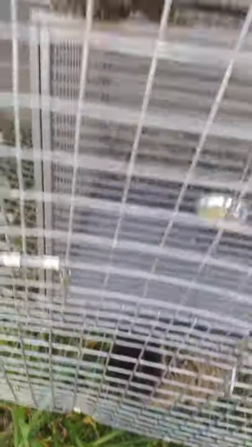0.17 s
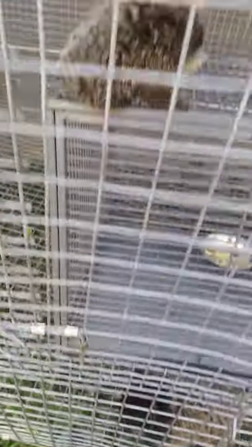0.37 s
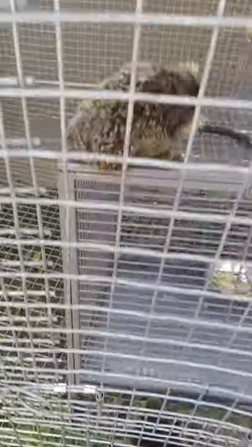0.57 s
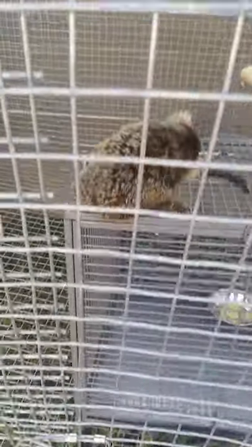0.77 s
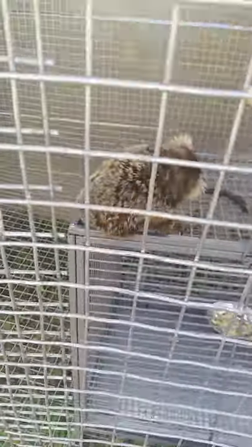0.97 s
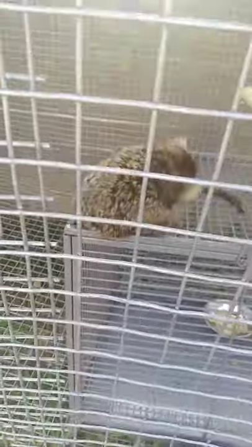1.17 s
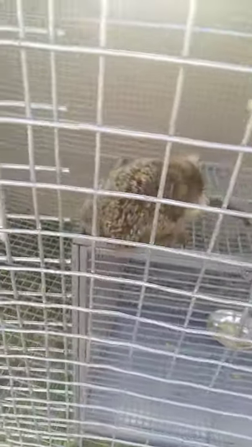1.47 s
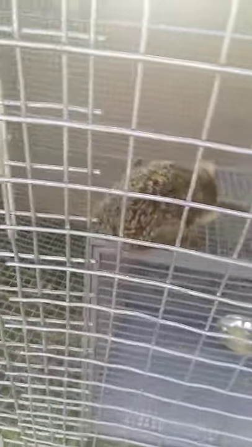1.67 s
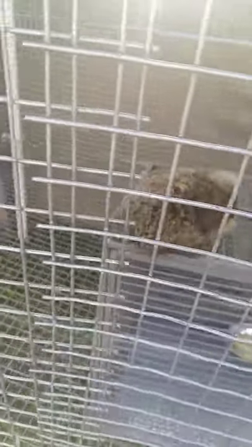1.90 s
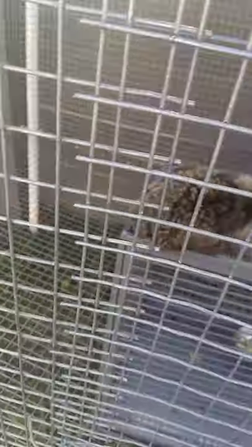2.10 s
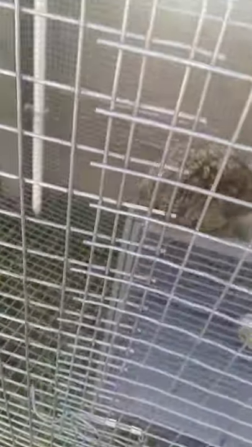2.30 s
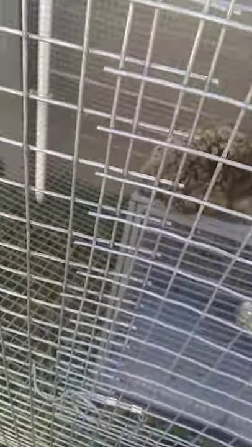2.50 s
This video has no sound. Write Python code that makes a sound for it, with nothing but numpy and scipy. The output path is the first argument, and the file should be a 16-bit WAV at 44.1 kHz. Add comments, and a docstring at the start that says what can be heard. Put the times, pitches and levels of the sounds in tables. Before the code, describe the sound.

One abrupt raspy screech from a caged animal comes late, after quiet rumbling, steady low hum and hiss, with soft hollow trickling blips, light wire taps and thin metallic squeaks, picked up by a nearby phone outdoors.

```python
"""A raspy call in a wire cage

A small animal in an outdoor wire cage gives one harsh call near a phone: rough pulses and breath ring narrow lines.
Before it, claws tick wires, which ring in their own modes, and scrape on fine mesh, a shimmer of rung lines.
Thin metallic whistles, made of tone and narrow noise, come and go; soft hollow blips, pairs of gliding tones,
sound like trickling water. Under it all lie a lumpy low rumble and microphone hiss, both shaped noise,
and a mains hum of two steady tones."""
import sys
import numpy as np
from scipy import signal
from scipy.io import wavfile
from scipy.ndimage import uniform_filter1d

SR = 44100
rng = np.random.default_rng(int(sys.argv[2]) if len(sys.argv) > 2 else 0)


def to_wav(s):
    """Save 16-bit WAV."""
    ch = np.atleast_2d(s).T  # columns
    pcm = np.round(np.clip(ch, -1, 1) * 32767)  # PCM
    wavfile.write(sys.argv[1], SR, pcm.astype(np.int16))


def how_loud(loudness_db):
    """Turn decibels into a plain amplitude multiplier (0 dB gives 1, 20 dB gives 10)."""
    steps = np.asarray(loudness_db, float) / 20
    return 10 ** steps


N = 116865  # length in samples


def evened(x):
    """Scales a sound to an rms of 1."""
    return x / np.sqrt(np.mean(x ** 2) + 1e-20)


def add(mix, start_s, sound):
    """Mixes a sound in at start_s seconds, cut off at the end of the mix."""
    start = round(start_s * SR)
    part = mix[start:start + len(sound)]
    part += sound[:len(part)]


def arch(size, rise):
    """Soft bump from 0 to 1 and back that peaks after the share rise of its length."""
    u = np.linspace(0, 1, size)
    rise = np.clip(rise, 0.05, 0.9)
    return np.sin(np.pi / 2 * np.minimum(u / rise, (1 - u) / (1 - rise)))


def noise(spectrum, patchy_db, size):
    """Noise from random short-time spectra, with patches of level that drift in pitch and time."""
    frames = 4 * N // size + 12
    hz = np.fft.rfftfreq(size, 1 / SR)
    real, imaginary, patches = rng.standard_normal((frames, len(hz), 3)).T
    patches = uniform_filter1d(patches, size=6, axis=0)
    patches = evened(uniform_filter1d(patches, size=6, axis=1))
    table_hz, table_db = np.transpose(spectrum)
    level_db = np.interp(np.log(hz + 1), np.log(table_hz), table_db)[:, None]
    spectra = (real + 1j * imaginary) * how_loud(level_db + patchy_db * patches)
    sound = signal.istft(spectra, nperseg=size, noverlap=size * 3 // 4)[1]
    return evened(sound[size:N + size])


def clicks(size, per_s, spread_db):
    """Irregular clicks of random sign; a few are large."""
    chance, sign, strength = rng.random((size, 3)).T
    happens = chance < per_s / SR
    level_db = spread_db * np.minimum(-np.log(strength + 1e-9), 4)
    return happens * np.sign(sign - 0.5) * how_loud(level_db)


def resonate(x, hz, width_hz):
    """Steep resonance of gain 1: shifts the pitch down to zero, smooths twice, shifts back."""
    turn = np.exp(2j * np.pi * np.cumsum(hz * np.ones(len(x))) / SR)
    r = np.exp(-np.pi * width_hz / SR)
    smooth = signal.lfilter([(1 - r) ** 2], [1, -2 * r, r * r], x / turn)
    return 2 * (turn * smooth).real


def cluster(lines, width_hz, size, per_s):
    """Irregular pulses and turbulence ring a cluster of narrow, wandering lines."""
    rasp_spread_db, breath = 2.5, 0.64  # breath: turbulence against pulses of rms 1
    drift = 0.0048  # rms share of the pitch by which the lines wander
    steady_s = 0.027  # effort is evened out over spans longer than this
    warm = size + SR // 10  # time for the lines to get going, cut off below
    drive = evened(clicks(warm, per_s, rasp_spread_db)) + breath * rng.standard_normal(warm)
    slow = uniform_filter1d(rng.standard_normal((len(lines), warm)), SR // 20)
    wander = 1 + drift * evened(slow)
    ring = np.zeros(warm)
    for (hz, db), bend in zip(lines, wander):
        ring += how_loud(db) * evened(resonate(drive, hz * bend, width_hz))
    power = abs(uniform_filter1d(ring ** 2, int(steady_s * SR)))
    steady = ring / np.sqrt(power + 1e-9)
    return evened(steady[-size:])


# The color of the low rumble. Each row: frequency in Hz, relative level in dB per Hz.
RUMBLE_COLOR = [(18, -25), (44, -16.5), (55, 2), (125, 1.5), (150, -1), (185, -9), (245, -13), (280, -26),
                (420, -40.5), (600, -90)]
# How loud the upper part of the rumble is, before gusts. Each row: time in seconds, level in dB rms.
UPPER_RUMBLE_LEVEL = [(0, -55.5), (.3, -55.5), (.55, -63.5), (.68, -62.5), (.75, -65), (.86, -58),
                      (1.12, -59), (1.49, -59), (1.57, -71), (1.61, -56), (1.74, -64), (1.83, -56.5),
                      (2.22, -59.5), (2.27, -67), (2.3, -52), (2.37, -64.5), (2.65, -63)]


def rumble():
    """Low noise that heaves with slow random gusts, most in its upper part."""
    split_hz, low_db, gust_db = 165, -47.5, 2.5
    low_follows = 0.24  # share of the upper part's level swings that the deep part follows
    t = np.arange(N) / SR
    gust = np.zeros(N)
    for hz in np.geomspace(2, 30, num=20):
        gust += np.sin(2 * np.pi * (hz * t + rng.random())) / np.sqrt(hz)
    level_db = np.interp(t, *np.transpose(UPPER_RUMBLE_LEVEL)) + gust_db * evened(gust)
    whole = noise(RUMBLE_COLOR, patchy_db=0.0, size=8192)
    low = signal.oaconvolve(whole, signal.firwin(SR // 10 + 1, split_hz, fs=SR), "same")
    upper = evened(whole - low) * how_loud(level_db)
    return how_loud(low_db) * evened(low * how_loud(low_follows * level_db)) + upper


# The tones of the mains hum. Each row: frequency in Hz, level in dB rms.
HUM_TONES = [(120, -52.5), (240, -70.5)]


def hum():
    """Steady sine tones of the mains."""
    t = np.arange(N) / SR
    return sum(how_loud(db) * np.sqrt(2) * np.sin(2 * np.pi * hz * t) for hz, db in HUM_TONES)


# The color of the microphone's hiss. Each row: frequency in Hz, relative level in dB per Hz.
HISS_COLOR = [(180, -24), (300, -6), (405, -7), (656, -4), (994, -4), (1150, -9.5), (1840, -15),
              (15000, -22.5), (16000, -16)]


def hiss():
    """Nearly steady noise of the microphone."""
    hiss_db = -71.5  # rms
    return how_loud(hiss_db) * noise(HISS_COLOR, patchy_db=0.33, size=1024)


def blip(hz, length_s):
    """Two close bubble tones that beat and rise a little in pitch."""
    glide = 0.11  # whole rise as a share of the pitch
    beat_hz, beat_share = 43.3, 0.4  # second bubble: this far above, this strong
    u = np.linspace(-0.5, 0.5, int(length_s * SR))
    phase = 2 * np.pi * np.cumsum(hz * (1 + glide * u)) / SR
    tones = np.sin(phase) + beat_share * np.sin(phase * (1 + beat_hz / hz))
    return arch(len(u), rise=0.33) ** 1.27 * tones


# Clear hollow blips. Each row: start in seconds, peak of the stronger tone in dB, pitch in Hz,
# length in seconds.
CLEAR_BLIPS = [(0.086, -61.5, 739, 0.06), (0.149, -60, 833, 0.013), (0.214, -65, 680, 0.026),
               (0.434, -56, 681, 0.046), (0.577, -58.5, 701, 0.029), (0.791, -51, 773, 0.016),
               (0.911, -63, 890, 0.015), (1.079, -60, 654, 0.063), (1.198, -60, 783, 0.019),
               (1.539, -60, 877, 0.012), (1.752, -59.5, 883, 0.014), (1.855, -66.5, 655, 0.039),
               (1.958, -65.5, 930, 0.021), (2.127, -54.5, 914, 0.018), (2.558, -70, 970, 0.038)]


def trickle():
    """Clear bubble blips over a random patter of small ones."""
    small_per_s, small_db = 40, -84  # all pitches together; rms
    clear, small = np.zeros(N), np.zeros(N)
    for start_s, db, hz, length_s in CLEAR_BLIPS:
        add(clear, start_s, how_loud(db) * blip(hz, length_s))
    for hz in np.geomspace(580, 1050, num=12):
        starts = clicks(N, small_per_s / 12, spread_db=0.0)
        small += signal.oaconvolve(starts, blip(hz, length_s=0.018))[:N]
    return clear + how_loud(small_db) * evened(small)


def tick(wire, db, rattle_s):
    """A sharp tap and a dying rattle ring the modes of one wire."""
    ring_s, crack_s, crack_db = 0.17, 0.026, 31  # times to fall 60 dB; crack over ring
    t = np.arange(SR // 4) / SR
    rattle = 0.066 * clicks(len(t), per_s=840, spread_db=2) * how_loud(-60 * t / rattle_s)
    rattle[0] = 1  # the tap itself
    modes = np.zeros(len(t))
    for hz, mode_db in wire:
        # the modes start loosely in step
        modes += how_loud(mode_db) * np.cos(2 * np.pi * hz * (t - 0.0015) + 2.0 * rng.random())
    fade = how_loud(-60 * t / ring_s) + how_loud(crack_db - 60 * t / crack_s)
    body = modes * fade * np.minimum(t / 0.003, 1) ** 2
    return how_loud(db) * signal.fftconvolve(rattle, body)[:len(t)] / abs(body).max()


# The ringing modes of three mesh wires. Each row: frequency in Hz, relative level in dB.
FIRST_WIRE = [(2840, -10), (3130, -4), (3400, 1), (3660, 0), (3720, -8), (3960, -3), (4760, -18),
              (5250, -10), (5560, -14), (5710, -6)]
SECOND_WIRE = [(2860, -2), (2990, 0), (3520, -2), (3680, 4.5), (3770, 0), (4200, -8), (4670, -7)]
THIRD_WIRE = [(3550, 3), (3800, 11), (4050, 9)]
# A claw ticks each wire, in that order; the second wire is hit again shortly after, a brief 4.7 kHz ring listed
# among the whistles. Each row: start in seconds, peak of the tap in dB, # time in seconds for the rattle to
# fall 60 dB.
CLAW_TICKS = [(0.4745, -46, 0.15), (1.012, -48.5, 0.2), (1.558, -60, 0.093)]


def claw_ticks():
    """Single claw taps, each of which rings one wire."""
    out = np.zeros(N)
    for (start_s, db, rattle_s), wire in zip(CLAW_TICKS, (FIRST_WIRE, SECOND_WIRE, THIRD_WIRE)):
        add(out, start_s, tick(wire, db, rattle_s))
    return out


# The lines of the fine mesh. Each row: frequency in Hz, relative level in dB.
FINE_MESH = [(6320, -1.5), (6450, -6), (6580, -6), (6960, -9), (7070, -4.5), (7240, -5), (7480, -4.5)]
# Claws drag over the mesh. Each row: start in seconds, length in seconds, level at the peak in dB rms,
# share of the length before the peak.
CLAW_SCRAPES = [(0.407, .33, -68, 0.18), (.922, 0.051, -80, 0.17)]


def claw_scrapes():
    """Dragging claws: dense irregular pulses ring the fine mesh."""
    out = np.zeros(N)
    for start_s, length_s, db, rise in CLAW_SCRAPES:
        size = int(length_s * SR)
        shimmer = cluster(FINE_MESH, 56, SR // 2, per_s=2000)[:size]
        add(out, start_s, how_loud(db) * arch(size, rise) ** 1.13 * shimmer)
    return out


def whistle(length_s, db, hz, last_hz=None):
    """A thin sound, mostly tone when low and narrow noise when high, that swells and fades."""
    all_noise_hz, width_hz = 6500, 116  # from all_noise_hz up there is no tone left
    size = int(length_s * SR)
    slide = np.linspace(hz, last_hz or hz, size)
    pitch = np.r_[np.full(SR // 2 - size, hz), slide]  # the noise warms up on the first pitch
    fuzz = evened(resonate(rng.standard_normal(SR // 2), pitch, width_hz))[-size:]
    tone = np.sqrt(2) * np.sin(2 * np.pi * (np.cumsum(slide) / SR + rng.random()))
    share = min((hz / all_noise_hz) ** 2, 1)
    blend = evened(np.sqrt(share) * fuzz + np.sqrt(1 - share) * tone)
    return how_loud(db) * arch(size, rise=0.14) * blend


# Whistles at one pitch; the row at 1.028 s is a brief second claw hit on the second wire. Each row: start in
# seconds, length in seconds, level at the peak in dB rms, # pitch in Hz.
LEVEL_WHISTLES = [(0, 0.026, -75.5, 5750), (0.341, 0.061, -76, 2680), (0.473, 0.12, -77.5, 1300),
                  (0.38, 0.28, -74, 7020), (0.923, 0.049, -80, 9000), (0.929, 0.045, -79, 8100),
                  (1.028, .014, -68, 4680), (1.475, .035, -83, 8070), (0.434, 0.12, -75.5, 8120),
                  (0.463, 0.1, -83, 10550), (1.436, 0.098, -78.5, 6530), (1.473, 0.076, -78, 7490),
                  (1.511, 0.0093, -72, 4060), (1.592, 0.15, -75.5, 7800), (1.757, 0.051, -82, 4400),
                  (1.808, 0.03, -76.5, 7200), (2.328, 0.038, -78.5, 4650), (2.504, .09, -73, 3600),
                  (2.567, .028, -76, 4650)]
# Sliding lines of the claws scraping over the mesh: one during the first scrape, the rest around 1.4 to 1.6 s.
# # Each row: start in seconds, length in seconds, level at the peak in dB rms, first pitch in Hz, last pitch in
# Hz.
SLIDING_WHISTLES = [(.49, 0.083, -79, 7870, 7800), (1.418, 0.09, -81.5, 7300, 6900),
                    (1.49, 0.11, -78, 7100, 7250), (1.565, .05, -79, 7000, 7800)]


def whistles():
    """The thin metallic whistles of the cage, each at its own time, together with a brief second hit on a wire
    and the sliding lines of the claw scrapes over the mesh."""
    out = np.zeros(N)
    for start_s, *settings in LEVEL_WHISTLES + SLIDING_WHISTLES:
        add(out, start_s, whistle(*settings))
    return out


def enclosure(x):
    """Adds the short diffuse tail of the enclosure, a fading burst of noise."""
    echo_db, echo_s = -6, 0.27  # tail against the direct sound; time to fall 60 dB
    t = np.arange(SR // 4) / SR
    tail = rng.standard_normal(len(t)) * how_loud(-60 * t / echo_s) * (t > 0.006)
    return x + how_loud(echo_db) * signal.fftconvolve(x, tail / np.linalg.norm(tail))[:N]


# The lines in each part of the call. Each row: frequency in Hz, relative level in dB.
MAIN_LINES = [(2020, -23), (2080, 1), (2155, 3.5), (2278, 1.5), (2415, 5.5), (2485, 7.5), (2565, 2),
              (2900, -2.5), (3050, -1)]
LOW_LINES = [(1160, -6.5), (1350, -2.5), (1470, 0), (1740, -7), (3740, -13)]
SECOND_LINES = [(4340, -7), (4560, 1), (4655, 3.5), (4800, -1), (5060, 6), (5160, -5), (5520, -3.5)]
TOP_LINES = [(6550, -4), (7020, -1.5), (7560, -2), (7800, 2), (8040, 5.5), (8400, 1), (8650, -4)]
# How each part swells and dies: main, low, second, top, faint tail of the top. Each row: held level
# in dB rms, rise in seconds, hold in seconds, time in seconds to fall 60 dB, line width in Hz.
CALL_SHAPES = [(-47.5, 0.011, 0.0096, 0.31, 97), (-57.5, 0.0023, 0.016, 0.18, 34),
               (-63.5, 0.016, 0.09, 0.33, 150), (-57.5, 0.0071, 0.016, 0.045, 150),
               (-71.5, 0.0072, 0.041, 0.5, 93)]


def call():
    """A rasp in four groups of lines; each part rises, holds and dies in its own time."""
    start_s, rasp_per_s = 2.348, 1600
    t = np.arange(SR * 3 // 10) / SR
    out = np.zeros(N)
    groups = (MAIN_LINES, LOW_LINES, SECOND_LINES, TOP_LINES, TOP_LINES)
    for lines, (db, rise_s, hold_s, fall_s, width_hz) in zip(groups, CALL_SHAPES):
        fade_db = -60 * np.maximum(t - rise_s - hold_s, 0) / fall_s
        shape = np.minimum(t / rise_s, 1) ** 2 * how_loud(db + fade_db)
        add(out, start_s, shape * cluster(lines, width_hz, len(t), rasp_per_s))
    return out


def scene():
    """All sources in one channel; the background eases in over 5 ms."""
    ease_in = np.minimum(np.arange(N) / (SR // 200), 1)
    background = (rumble() + hum() + hiss()) * ease_in
    cage = enclosure(trickle() + claw_ticks() + claw_scrapes() + whistles())
    return (background + cage + call())[None]


def top_cut(x):
    """Nothing passes above the cut-off."""
    return signal.sosfilt(signal.butter(12, 16130, fs=SR, output="sos"), x)


def record(dry):
    """The phone takes in the scene and cuts the highest treble."""
    edge_hz = 15750
    edge = signal.firwin(SR // 50 + 1, edge_hz, window="blackman", fs=SR)
    mix = signal.oaconvolve(dry, edge[None], "same")
    return top_cut(mix)


dry = scene()
out = record(dry)
to_wav(out)
```